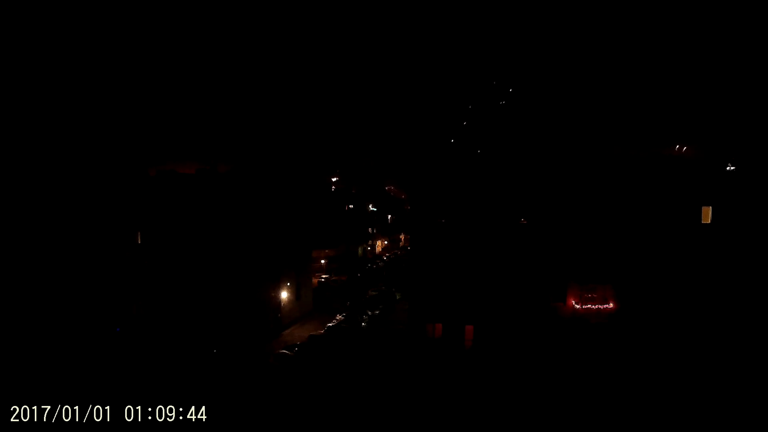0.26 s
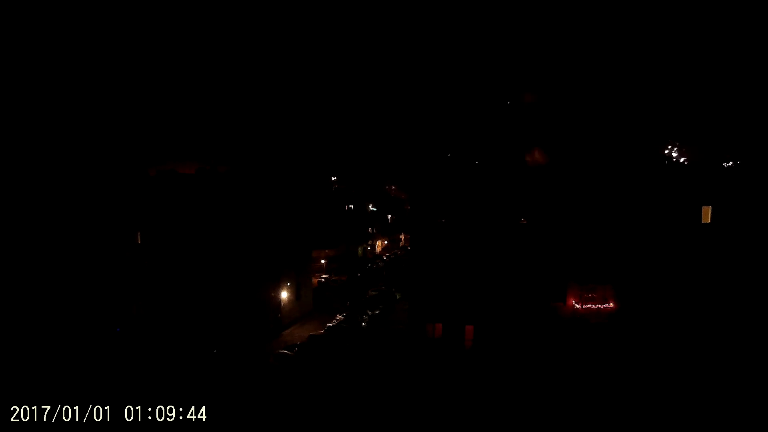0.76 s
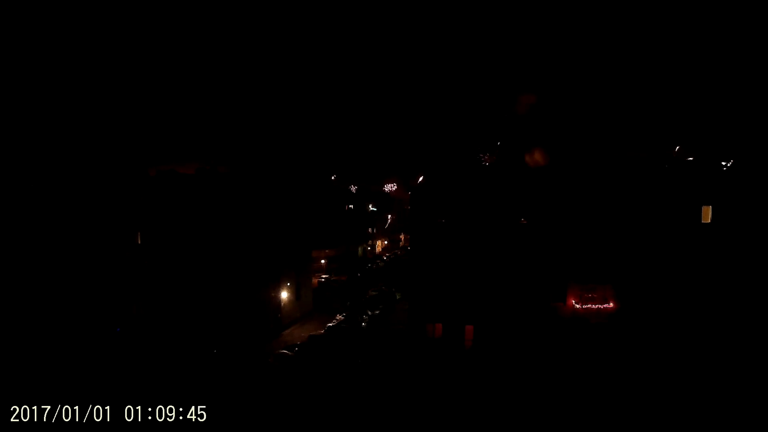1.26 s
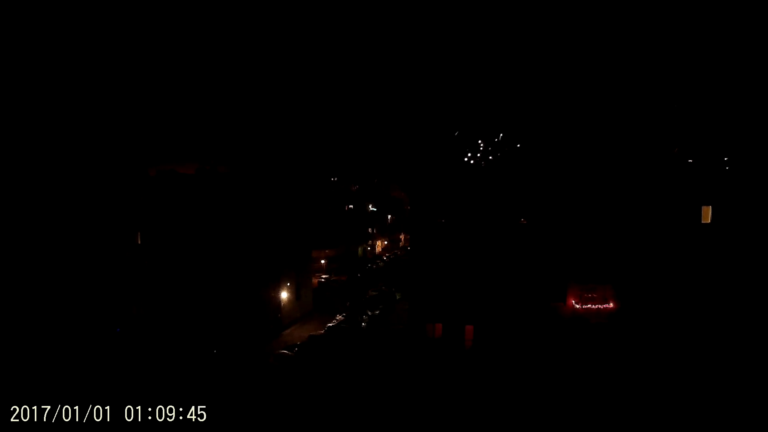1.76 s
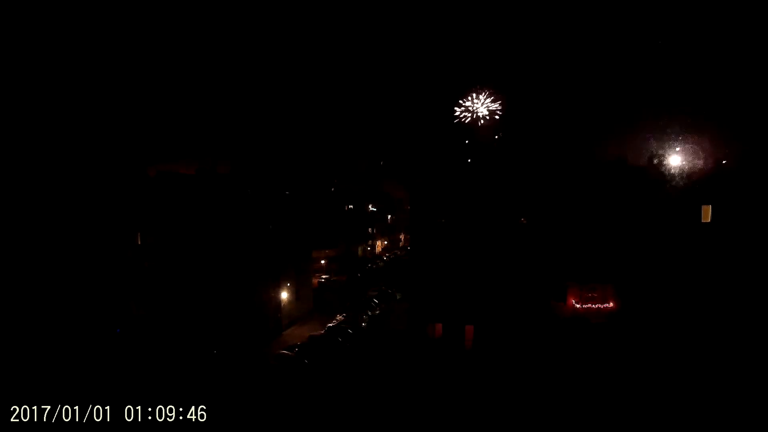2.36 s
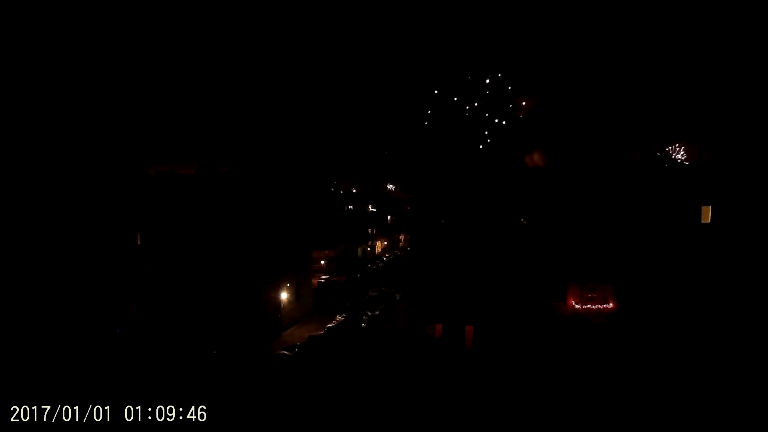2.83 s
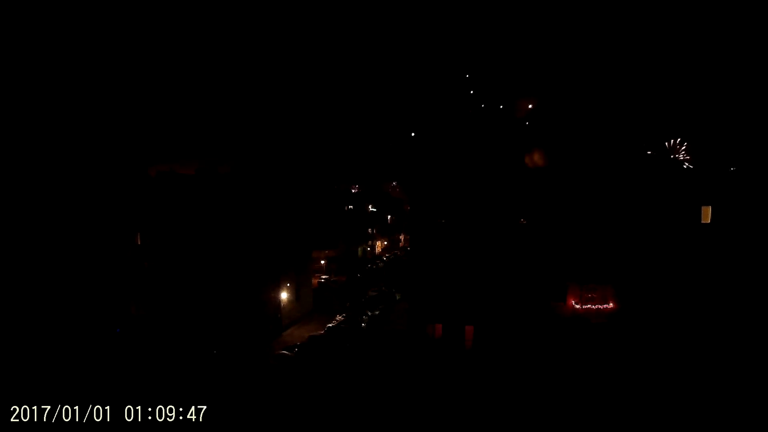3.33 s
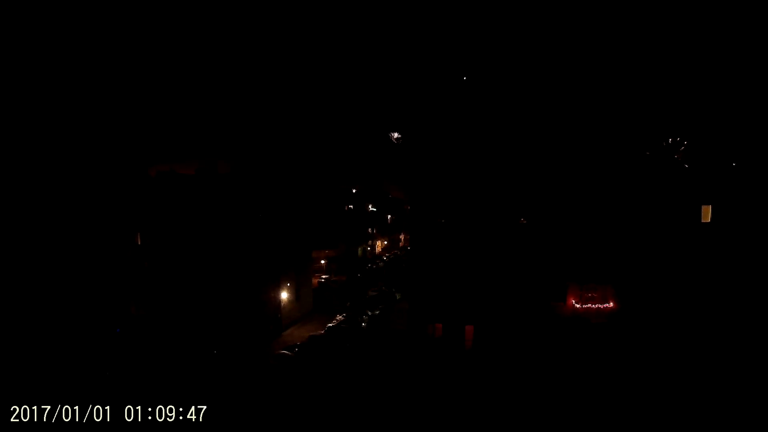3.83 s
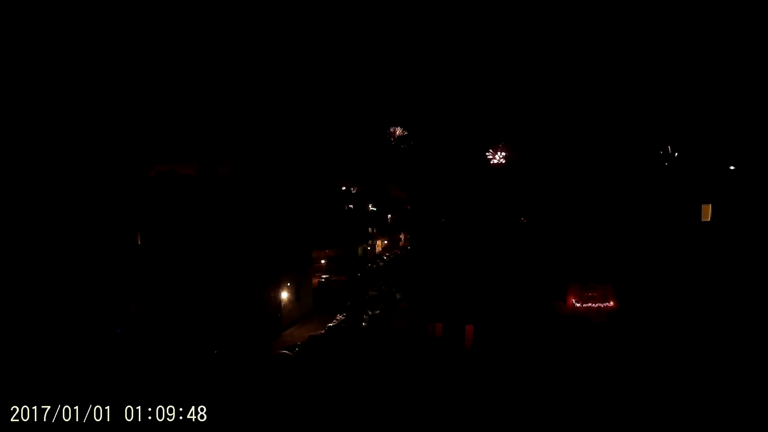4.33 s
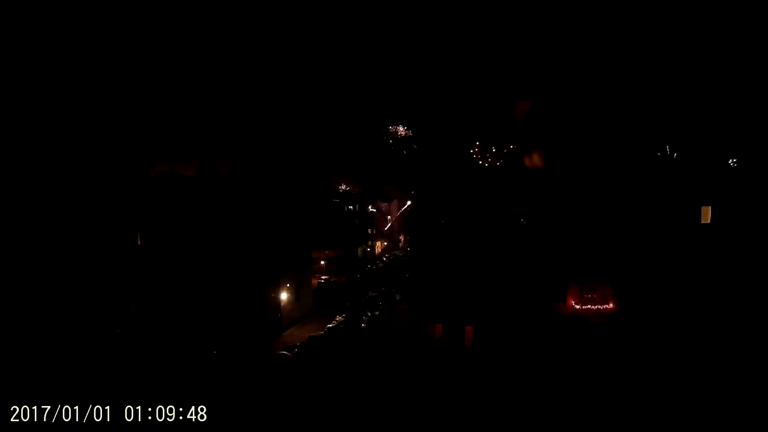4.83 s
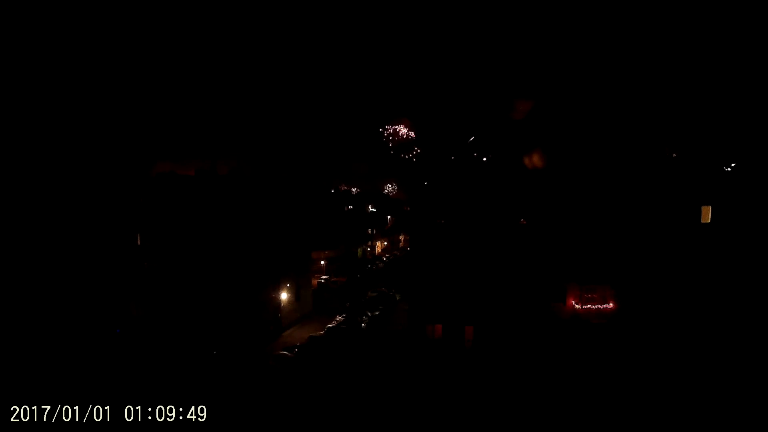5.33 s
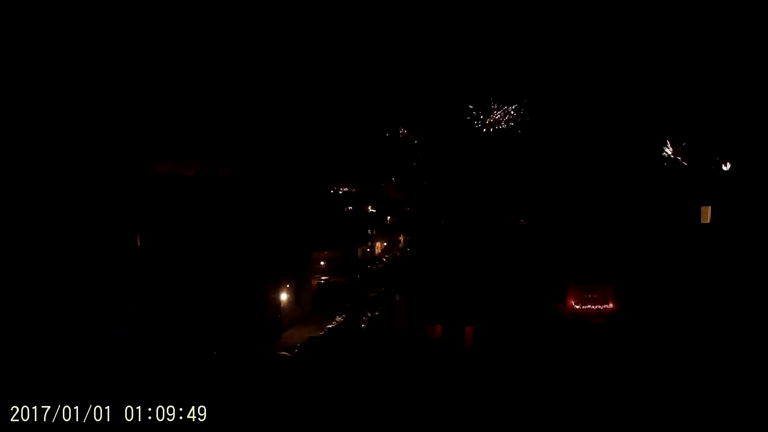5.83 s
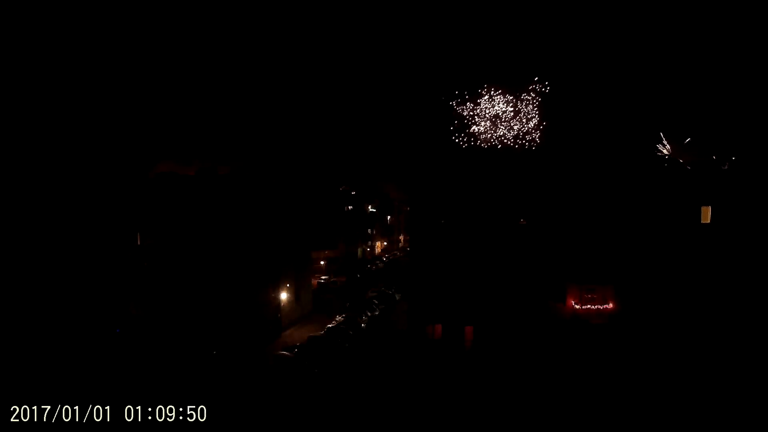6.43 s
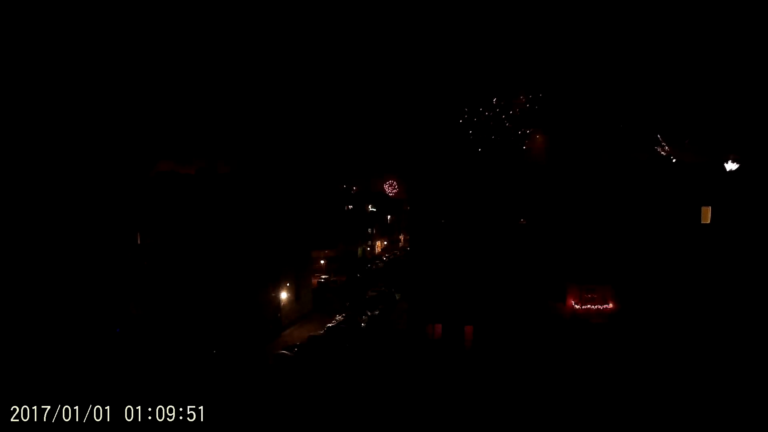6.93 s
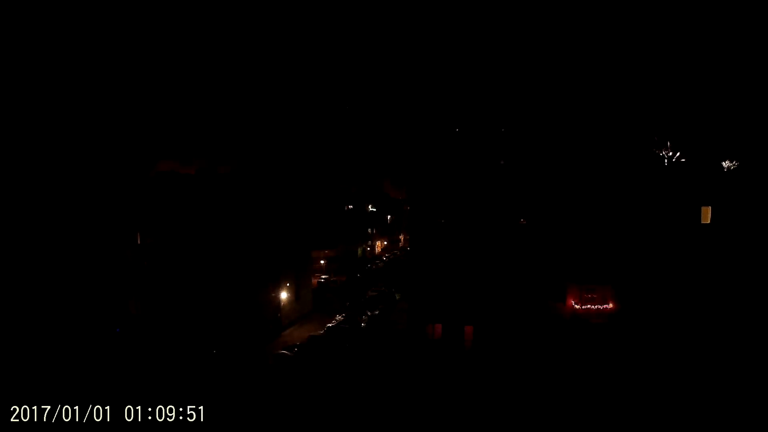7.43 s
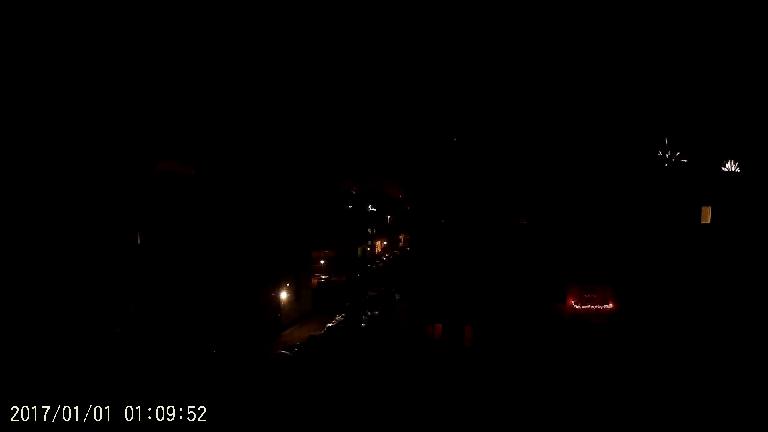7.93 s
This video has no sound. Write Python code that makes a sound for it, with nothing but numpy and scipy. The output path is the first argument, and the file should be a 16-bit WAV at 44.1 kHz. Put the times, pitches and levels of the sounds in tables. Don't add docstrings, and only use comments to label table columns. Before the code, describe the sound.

Fireworks burst continuously over a street, dull booms and thuds behind glass, dry crackle between them, and one sharp nearby cracker snap midway.

```python
import sys
import numpy as np
from scipy import signal
from scipy.fft import rfft, irfft, next_fast_len
from scipy.io import wavfile
from scipy.ndimage import uniform_filter1d

SR = 44100
rng = np.random.default_rng(int(sys.argv[2]) if len(sys.argv) > 2 else 0)


def transcribe(signal):
    frames = np.atleast_2d(signal).T
    limited = np.clip(frames, -1, 1)
    pcm = np.round(limited * 32767).astype(np.int16)
    wavfile.write(sys.argv[1], SR, pcm)


def attenuation_scalar(level_db):
    decades = np.asarray(level_db, float) / 20
    return 10 ** decades


N = 360738

# start_s, strength_db, stars_db (crackle of burning stars)
BARRAGE = [(0, -40, 1.5), (.45, -49, 1), (.75, -46.5, 0.3), (1.25, -56, -1), (1.5, -42.5, -2),
           (2.25, -51, -1), (2.73, -33.5, 2.5), (3.2, -44, 3.5), (3.33, -44, 0), (3.95, -39.5, 4),
           (4.14, -42.5, 1), (4.9, -46, -1.5), (5.1, -43, 8), (5.68, -39, 1.5), (5.8, -46, -1.5),
           (6.2, -37.5, 6), (6.85, -39.5, 1.5), (7.45, -44.5, 0)]
BAND_EDGES = [350, 750, 1300]
BARRAGE_COLOUR = [-5, -3.5, -8, -23]
STAR_SHARE = [-1.1, .05, .55, 1]
ROLL_COLOUR = [-1.5, -1.5, -7.5, -21]
# pitch_hz, level_db
TOWN = [(12, -34), (20, -3.5), (221, 1.5), (282, -2), (561, -8.5), (910, -2), (1230, -21), (2500, -30),
        (3250, -76), (5500, -120)]
# pitch_hz, level_db
PANE = [(15, -65), (25, -29), (97, -7.5), (224, 5), (521, 1), (569, 8.5), (665, -4.5), (927, 2),
        (1260, -16), (1680, -20), (2000, -27), (3300, -39), (5000, -54.5), (6500, -88), (11000, -120)]
# pitch_hz, width_hz, level_db
PANE_RING = [(227, 8.7, -19), (412.3, 42, -2), (577, 1.8, -14), (724, 67, 1.5), (922, 12, 1.5),
             (1080, 10, -27), (1334, 250, -3.5)]
# delay_s, level_db
WALLS = [(.0045, -1), (.0087, -7), (.0125, -16), (.021, -16)]
BLAST_FRONT = [
    [1],
    [5],
    [6],
    [-3],
]
# start_s, peak_db, boom_db, snap_db, tail_db
BIG = [(1.336, -20.5, -10, -19.5, -13), (1.758, -21, -10, -14, -9.5), (1.944, -17.5, -6.5, -13.5, -14),
       (2.495, -19, -23, -19.5, -9.5), (2.56, -5, -1.5, -9.5, -20), (3.355, -12, -11, -16, -20),
       (3.415, -12, -32, -16, -30), (3.835, -26.5, 1, -0.5, -15), (3.901, -29, -2.5, -6, -3.5),
       (4.924, -24, 7, -7.5, -15.5), (5.113, -26.5, -4.5, -6.5, -5), (5.228, -26.5, -5.5, -7.5, -3.5),
       (5.336, -13.5, -5, -10.5, -13), (5.524, -21, -33, -13.5, -12.5), (5.965, -5, -5, -8.5, -25.5),
       (6.388, -16.5, -4.5, -16, -13.5), (6.422, -20, -9, -13, -2), (6.472, -10, -26, -14, -14.5),
       (6.92, -21.5, -35, -3.5, -13.5), (7.172, -19, -25, -8, -14.5), (7.458, -28.5, 11.5, -6, -20),
       (7.82, -27.5, -20, -5, -9.5), (8.097, -20.5, -20, -9.5, -12)]
# start_s, peak_db, boom_db, snap_db
OPEN = [(.363, -30.5, -21, -13), (.76, -37.5, -1, -0.5), (1.308, -30, 2, -9), (1.357, -18, -11, -17.5),
        (1.615, -38.5, -11, -4), (2.652, -26, -17, -10), (2.743, -24, -3.5, -6), (2.776, -35, -12, -8),
        (2.804, -32, -3, -14), (2.865, -29, -7, -27), (3.09, -31, 2, -2), (3.392, -20.5, -12, -19),
        (3.631, -34, -13, -5), (4.172, -17.5, -5, -17), (4.327, -34, 1, -5.5), (4.411, -27.5, -15, -39),
        (4.756, -33, -2.5, -5.5), (4.997, -24.5, -31, -17), (5.087, -35, -6, -9), (5.25, -35, -10, -2),
        (5.42, -35, -10, -3), (6.126, -18, -3.5, -13), (6.24, -29.5, -9, -1.5), (6.302, -35.5, -12, -1),
        (6.637, -39, -5, -21), (6.891, -44, -7, -15), (7.099, -34.5, -1, 0.5), (7.563, -43, -8, -5),
        (7.669, -34, -15, -3), (7.744, -34, 3, -11.5)]
# start_s, peak_db, boom_db, snap_db
LOW = [(.005, -25.5, -5, -17), (.18, -39, -18, -2.5), (1.469, -32.5, 1.5, -5.5), (1.657, -40, -22, -1.5),
       (1.794, -20.5, -7, -15), (1.988, -34.5, -19, -7.5), (2.079, -34, -2, -7), (2.374, -29, -28, -9.5),
       (2.722, -54.5, -8, 3), (2.918, -29, -26, -7.5), (2.957, -28, -24, -6), (3.05, -46, -15, -10),
       (3.121, -41, -17, -10), (3.181, -35, -4, -5), (3.652, -23, -18, -15), (3.772, -30.5, -15, -21),
       (4.004, -46, -3, -1), (5.173, -27.5, -10, -6.5), (5.279, -35, -3, -2), (6.016, -17, -26, -16.5),
       (6.057, -24.5, -6, -11.5), (6.15, -31, -24, 0), (6.327, -26, -15, -14), (6.532, -21, -11, -14),
       (6.727, -32, 0, -11.5), (6.98, -24, -11, -10.5), (7.227, -34, 0, 3.5), (7.322, -31.5, -4, -6),
       (7.873, -21, -4, -17), (7.965, -37.5, -2, -4)]
# start_s, peak_db, boom_db, snap_db, tail_db, tail_t60_s
SALUTES = [(0.0395, -44, -22, 4, -18, 0.086), (0.5194, -50.5, -22, -3, -0.5, 0.52),
           (0.603, -42.5, -18, -4.5, -7, 0.19), (0.6574, -46.5, -13, 2, -5, 0.073),
           (1.8733, -45, -20, -4, -2, 0.18), (5.0301, -45, -10, 4, -13, 0.19),
           (6.4894, -34, -15, 1, -15.5, 0.29), (7.27, -39.5, -30, 7, -7.5, 0.11)]
# middle_s, level_db, length_s
ROCKETS = [(.01, -74, 0.014), (.055, -80, .012), (0.118, -70, .018), (.155, -77, .01), (.235, -73, .015),
           (.29, -77, .01), (6.81, -70, 0.022), (7.876, -75, 0.03), (8, -80, .02)]
# pitch_hz, level_db
ROCKET_TONE = [(2900, -60), (3500, -7), (3900, -3), (4400, -9), (5200, -60)]
# start_s, peak_db, pitch_hz
PINGS = [(0.3637, -42, 1150), (1.4992, -30, 1080), (4.7455, -30, 1067), (5.648, -32.5, 1082)]
# pitch_hz, level_db
RATTLE = [(4000, -50), (5200, 2), (6000, -49), (9900, -36), (10800, 2.5), (11800, -25), (12500, -63.5)]
# start_s, peak_db, boom_db, snap_db, tail_db, tail_t60_s
CRACKERS = [
    (4.3685, -22.5, 3, -10.5, -9, 0.083),
    (4.5984, -8.5, -2.5, -18.5, -19, 0.22),
]
# pitch_hz, level_db
SNAP_TONES = [
    [(180, -37), (300, -7), (486, -8), (1070, 2), (1450, -11), (2590, -16), (3290, -38), (4260, -26),
     (6270, -31), (7720, -48), (9990, -38), (14000, -59)],
    [(35, -38), (60, -8), (605, 0), (938, -1), (1920, -13), (2850, -39), (3660, -21), (4510, -20),
     (4950, -25), (5680, -43), (7000, -37), (9230, -54), (10400, -54), (13100, -71), (15000, -69)],
]
# start_s, level_db
GATE = [(0, -77), (.13, -87), (2.5, -84.5), (2.62, -79), (3.26, -76.5), (3.33, -86.5), (3.85, -87),
        (3.94, -74), (4.05, -80), (4.12, -87.5), (4.85, -86.5), (5.25, -80.5), (5.67, -76.5), (5.85, -90),
        (6.2, -77), (6.86, -77.5), (7.11, -85), (8.18, -86)]
# pitch_hz, level_db
WHINE = [(9415, -99), (9491, -86), (9523, -85), (9561, -84), (9636, -92), (9706, -96)]
# pitch_hz, level_db
HISS = [(1290, -34.5), (2200, -6.5), (4680, -5.5), (5040, -6.5), (13500, -7.5), (15100, -7.5),
        (15600, -13.5)]

TOWN_DB, HISS_DB, WHINE_DB = -56.5, -72.5, -78
TOP_HZ = 15700
BUZZ_HZ = 36.3
START_LAG_S = 0.0008
OPEN_TAIL_DB, LOW_TAIL_DB = -12, -11.5
BIG_T60_S, OPEN_T60_S, LOW_T60_S = 0.23, 0.3, 0.39
CLUMP_DB, CLUMP_S = 3.5, 0.0122
ROLL_DB, ROLL_T60_S, ROLL_RISE_S = -19.5, 0.55, 0.041
GATE_SHARE = 0.39
CHATTER, FLINCH = 0.25, 0.16


def unit(x):
    return x / np.sqrt(np.mean(x ** 2) + 1e-20)


def along(points, hz):
    point_hz, db = np.transpose(points)
    return attenuation_scalar(np.interp(np.log(hz + 1), np.log(point_hz + 1), db))


def curves(rows):
    times, *columns = np.transpose(rows)
    return [np.interp(np.arange(N) / SR, times, column) for column in columns]


def filtered(x, response):
    size = next_fast_len(N + SR // 2)
    hz = np.fft.rfftfreq(size, 1 / SR)
    return irfft(rfft(x, size) * response(hz), size)[..., :N]


def noise(spectrum):
    return unit(filtered(rng.standard_normal(N), lambda hz: along(spectrum, hz)))


def window(size=8192):
    hz = np.fft.rfftfreq(size, 1 / SR)
    ring = 1 + sum(attenuation_scalar(db) * width * hz / np.abs(c * c - hz * hz + 1j * hz * width)
                   for c, width, db in PANE_RING)
    folded = irfft(np.log(along(PANE, hz) * ring + 1e-6))
    folded[1:size // 2] *= 2
    folded[size // 2 + 1:] = 0
    lag = 1j * hz / 1500
    return irfft(np.exp(rfft(folded)) * (1 - lag) / (1 + lag))


def all_shells():
    big = [(*row, BIG_T60_S) for row in BIG]
    in_open = [(*row, OPEN_TAIL_DB, OPEN_T60_S) for row in OPEN]
    low = [(*row, LOW_TAIL_DB, LOW_T60_S) for row in LOW]
    return big + in_open + low


def pops(rate, spread_db, t60, wash):
    hits = (rng.random(N) < rate / SR) * attenuation_scalar(spread_db * rng.exponential(size=N))
    t = np.arange(SR // 8) / SR
    power = np.abs(signal.fftconvolve(hits ** 2, attenuation_scalar(-120 * t / t60))[:N])
    return unit(rng.standard_normal(N) * np.sqrt(wash + power / power.mean()))


def roll():
    power = np.zeros(N)
    for s, db, *_ in all_shells():
        power[round(s * SR)] += attenuation_scalar(2 * (db + ROLL_DB))

    def fade(seconds):
        return signal.lfilter([1], [1, -np.exp(-1 / (seconds * SR))], power)

    decay_s = ROLL_T60_S / np.log(10 ** 6)
    quick_s = 1 / (1 / decay_s + 1 / ROLL_RISE_S)
    return np.abs(fade(decay_s) - fade(quick_s))


def barrage(pane):
    far = pops(90, 1.8, 0.14, wash=1.3)
    stars = pops(400, 2.2, 0.06, wash=0.6)
    sources = np.array([far, far + 0.5 * stars, stars + 0.43 * far, stars])
    muffled = signal.fftconvolve(sources, pane[None], axes=1)[:, :N]
    bands = filtered(muffled, lambda hz: np.digitize(hz, BAND_EDGES) == np.arange(4)[:, None])
    strength_db, stars_db = curves(BARRAGE)
    answer = roll()
    out = np.zeros(N)
    for db, share, roll_db, band in zip(BARRAGE_COLOUR, STAR_SHARE, ROLL_COLOUR, bands):
        power = attenuation_scalar(2 * (strength_db + db + share * stars_db)) + attenuation_scalar(2 * roll_db) * answer
        out += np.sqrt(power) * unit(band)
    return out


def town():
    return attenuation_scalar(TOWN_DB) * noise(TOWN)


def hiss(gain):
    return attenuation_scalar(HISS_DB) * np.sqrt(0.78 + 1.44 * gain ** 2) * noise(HISS)


def whine():
    t = np.arange(N) / SR
    out = np.zeros(N)
    for hz, db in WHINE:
        k = round((hz - WHINE[2][0]) / BUZZ_HZ)
        out += attenuation_scalar(db) * np.sin(2 * np.pi * (9525 + k * BUZZ_HZ) * t + np.pi / 2 * (k % 2))
    return unit(out)


def split(x):
    def low_pass(hz, edge):
        return 1 / (1 + 1j * np.sqrt(2) * hz / edge - (hz / edge) ** 2) ** 2

    def bands(hz):
        lows = [0 * hz] + [low_pass(hz, edge) for edge in BAND_EDGES] + [1 + 0 * hz]
        return np.diff(np.array(lows), axis=0)

    return filtered(x, bands)


def shells(rows, pane, fizz_db, direct):
    bands = np.zeros((4, N + SR))
    t = np.arange(SR // 2) / SR
    for s, db, boom_db, snap_db, tail_db, t60 in rows:
        tail = attenuation_scalar(tail_db - 7.5 - 60 * t / max(t60, 0.03)) * rng.standard_normal(len(t))
        tail *= 1 - np.exp(-t / 0.005)
        tail *= attenuation_scalar(CLUMP_DB * np.interp(t / CLUMP_S, np.arange(99), rng.standard_normal(99)))
        blast = direct * (t == 0)
        chances = rng.standard_normal((len(WALLS), 2))
        for (delay, wall_db), (stretch, more_db) in zip(WALLS, chances):
            blast[round(delay * (1 + 0.02 * stretch) * SR)] += attenuation_scalar(wall_db + 1.2 * more_db)
        bright_db = snap_db + fizz_db + 0.34 * (db + 12.5)
        gains = attenuation_scalar(db - 7.5 + np.array([boom_db + 9.5, 0.1, snap_db + 11.0, bright_db]))
        start = round((s + START_LAG_S) * SR)
        bands[:, start:][:, :len(t)] += gains[:, None] * (tail + blast * attenuation_scalar(BLAST_FRONT))
    return signal.fftconvolve(split(bands[:, :N]).sum(0), pane / np.abs(pane).max())[:N]


def rockets():
    t = np.arange(N) / SR
    swells = sum(attenuation_scalar(db) * np.exp(-((t - s) / length) ** 2 / 2) for s, db, length in ROCKETS)
    return swells * noise(ROCKET_TONE)


def salutes(pane):
    return shells(SALUTES, pane, fizz_db=24, direct=1.0)


def pings():
    out = np.zeros(N + SR)
    t = np.arange(SR // 5) / SR
    for s, db, hz in PINGS:
        swell = attenuation_scalar(db - 2 - 60 * t / 0.088) * (1 - np.exp(-t / 0.0059))
        out[round(s * SR):][:len(t)] += swell * np.sin(2 * np.pi * hz * t)
    return out[:N]


def rattle():
    shake = np.zeros(N + SR)
    t = np.arange(SR // 20) / SR
    for s, db, *_ in BIG:
        tick = attenuation_scalar(3.9 * db - 28.5 - 60 * t / 0.013) * (1 - np.exp(-t / 0.002))
        shake[round((s + START_LAG_S) * SR):][:len(t)] += tick
    return shake[:N] * noise(RATTLE)


def crackers(pane):
    out = -attenuation_scalar(-1.5) * shells(CRACKERS, pane, fizz_db=16, direct=0.0)
    t = np.arange(N) / SR
    for (s, db, *_), tone in zip(CRACKERS, SNAP_TONES):
        bang = 1.0 * (np.arange(N) == round(s * SR))
        flutter = (t > s + 0.001) * attenuation_scalar(-24 - 60 * np.abs(t - s) / 0.012) * rng.standard_normal(N)
        colour = lambda hz: along(tone, hz) * np.exp(-1.1j)
        out += attenuation_scalar(db) * filtered(bang + flutter, colour) / np.abs(filtered(bang, colour)).max()
    return out


def scene():
    pane = window()
    bangs = shells(all_shells(), pane, fizz_db=13, direct=1.0) + salutes(pane) + crackers(pane)
    glass = pings() + rattle()
    return (bangs + barrage(pane) + glass + rockets() + town())[None]


def band_limit(x):
    return signal.sosfilt(signal.butter(12, 15760, fs=SR, output="sos"), x)


def record(dry):
    gate_db = curves(GATE)[0]
    power = np.abs(uniform_filter1d(dry[0] ** 2, size=2600, origin=1200))
    loud_db = 10 * np.log10(power + 1e-9)
    twitch_db = np.clip(loud_db - uniform_filter1d(loud_db, size=20000, mode='nearest'), -8, 8)
    flinch_db = -FLINCH * np.maximum(twitch_db, 0)
    gain = attenuation_scalar(gate_db + 76.5 + np.where(gate_db < -82, CHATTER * twitch_db, flinch_db))
    ducked = dry * attenuation_scalar(GATE_SHARE * (gate_db + 82.5))
    heard = filtered(ducked, lambda hz: hz < TOP_HZ)
    mix = heard + hiss(gain) + attenuation_scalar(WHINE_DB) * gain * whine()
    return band_limit(mix)


dry = scene()
out = record(dry)
transcribe(out)
```